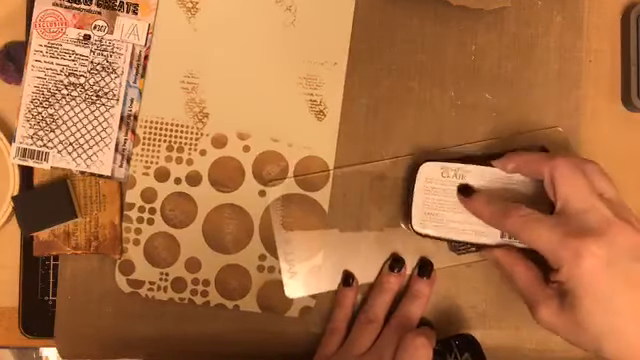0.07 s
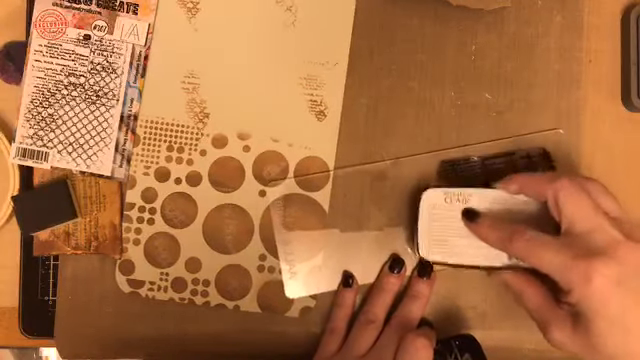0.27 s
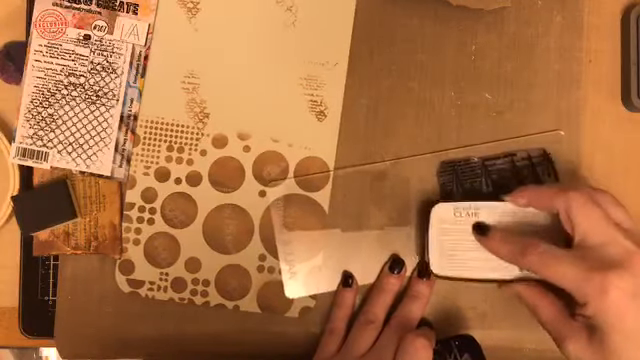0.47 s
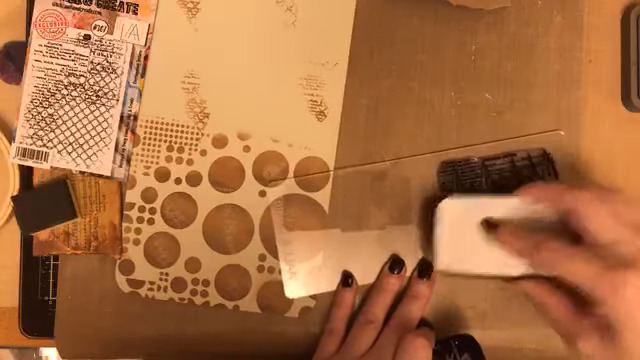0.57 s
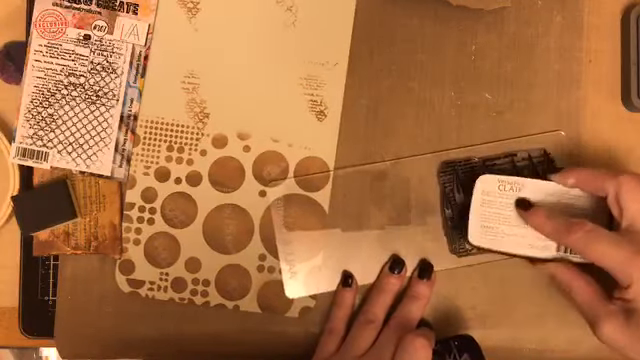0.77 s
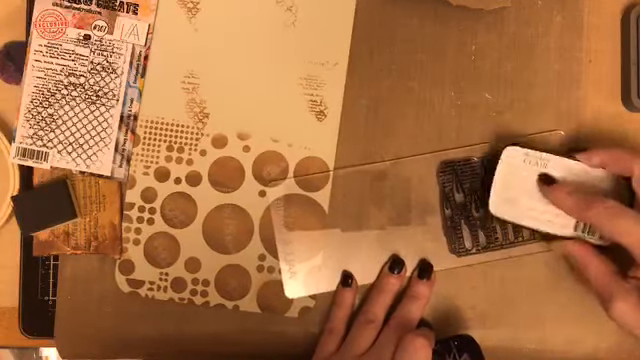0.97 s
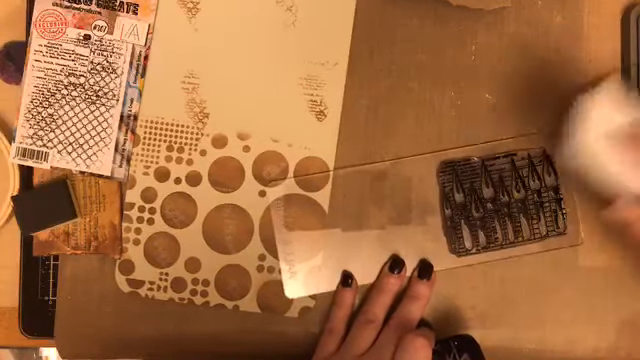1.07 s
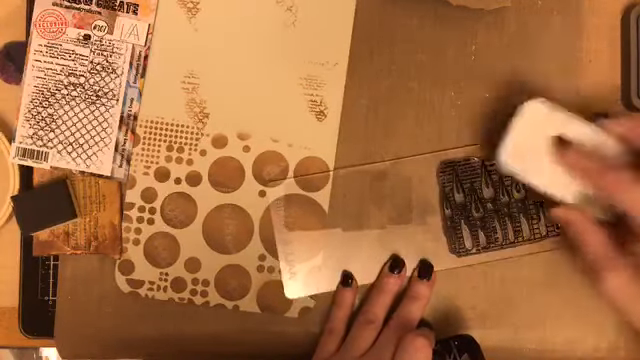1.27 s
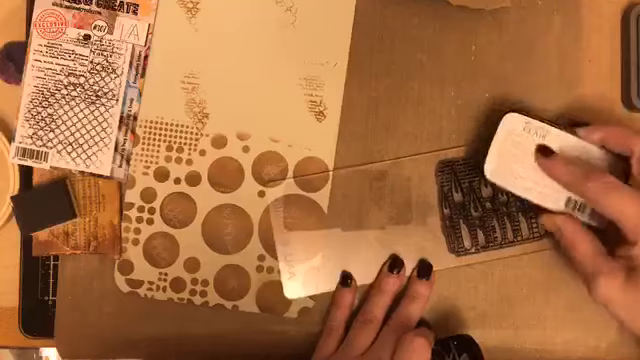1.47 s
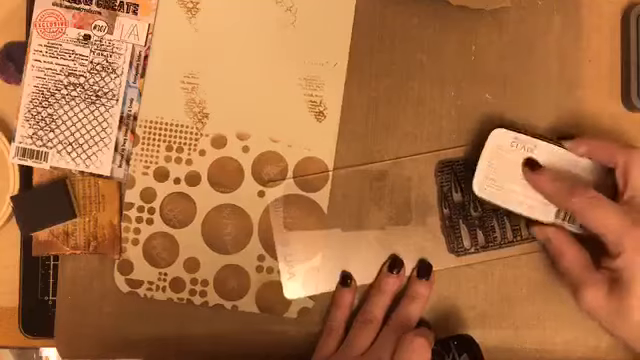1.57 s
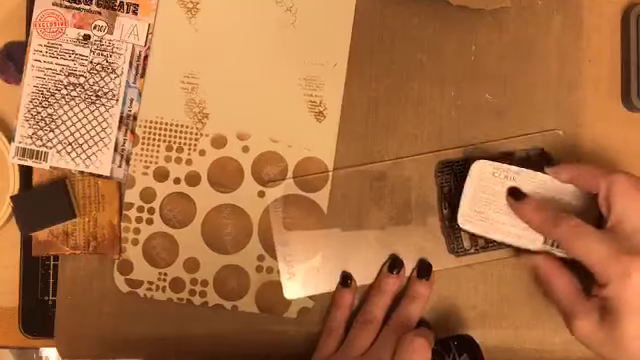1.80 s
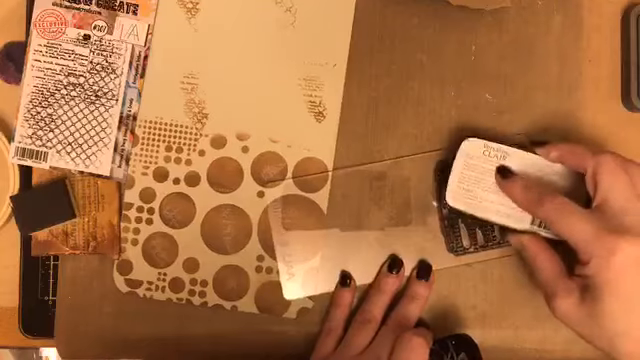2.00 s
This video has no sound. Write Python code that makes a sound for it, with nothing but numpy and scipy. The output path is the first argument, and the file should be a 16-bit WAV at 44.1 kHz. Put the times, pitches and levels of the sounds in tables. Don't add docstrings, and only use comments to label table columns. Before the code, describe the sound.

A plastic ink pad patted repeatedly onto a clear rubber stamp, light clacky taps in a quiet room

```python
import sys
import numpy as np
from scipy import signal
from scipy.fft import rfft, irfft
from scipy.io import wavfile
from scipy.ndimage import uniform_filter1d

SR = 44100
rng = np.random.default_rng(int(sys.argv[2]) if len(sys.argv) > 2 else 0)


def waveform_to_disk(signal):
    frames = np.transpose(np.atleast_2d(signal))
    scaled = np.clip(frames, -1, 1) * 32767
    samples = np.round(scaled).astype(np.int16)
    wavfile.write(sys.argv[1], SR, samples)


def amplitude_ratio(level_db):
    exponent = np.asarray(level_db, float) / 20
    return 10 ** exponent


N = 90052

# time in seconds, level in dB.
JOLTS = [
    (-.1923, 3.6),
    (.0408, -.6),
    (.2654, 1.1),
    (.4717, -.2),
    (.6966, 2.4),
    (.9104, -.6),
    (1.3498, 1.9),
    (1.5778, 1.7),
    (1.794, 3.2),
    (2.0233, 4.8),
]
# frequency in Hz, level in dB.
CRACK = [(420, -22.5), (850, 5), (1620, 4.5), (4520, -9.5), (6760, -11.5), (9400, -19), (12200, -20),
         (16000, -20.5)]
# frequency in Hz, level in dB.
PEEL = [(200, -31), (600, 0.5), (1400, 3.5), (2500, -1.5), (5000, -1.5), (9000, -8.5), (16000, -9.5)]
DETUNE, PLACE_DB = 0.008, 1.5


def read(points, hz):
    f, value = np.transpose(points)
    return np.interp(np.log(hz + 1), np.log(f + 1), value)


def add(mix, s, sound):
    k = round(s * SR)
    sound = sound[max(-k, 0):]
    part = mix[max(k, 0):][:len(sound)]
    part += sound[:len(part)]


def colour(x, points, tilt_db):
    hz = abs(np.fft.fftfreq(2048, 1 / SR))
    gain_db = read(points, hz) + tilt_db * np.log2((hz + 100) / 1500)
    log_gain = np.log(amplitude_ratio(gain_db))
    taps = np.fft.ifft(np.exp(signal.hilbert(log_gain).conj())).real[:1024]
    return signal.oaconvolve(x, taps / np.linalg.norm(taps))[:len(x)]


def ring(t, hz, db, t60):
    return amplitude_ratio(db - 60 * t / t60) * np.sin(2 * np.pi * hz * t)


def clicks(count, per_s, spread_db):
    u = rng.random(count)
    size = np.minimum(rng.exponential(1, count), 3) - 2
    sign = rng.choice([-1., 1.], count)
    return (u < per_s / SR) * amplitude_ratio(spread_db * size) * sign


def air():
    # frequency in Hz, level in dB per Hz.
    air_spectrum = [(25, 9.5), (60, 1.5), (120, -8.5), (250, -13), (630, -23), (2000, -26), (5000, -31.5),
                    (16000, -42.5)]
    air_db, patch_db = -66.5, 1.
    frames, hz = N // 256 + 5, np.fft.rfftfreq(1024, 1 / SR)
    a, b, patch = rng.standard_normal((frames, 513, 3)).T
    patch = uniform_filter1d(uniform_filter1d(patch, size=12, axis=0), size=12, axis=1)
    z = (a + 1j * b) * amplitude_ratio(read(air_spectrum, hz)[:, None] + patch_db * patch / patch.std())
    x = signal.istft(z, nperseg=1024, noverlap=768)[1][:N]
    above = signal.sosfilt(signal.butter(4, 100, "high", fs=SR, output="sos"), x)
    return amplitude_ratio(air_db) * x / above.std()


def table():
    # frequency in Hz, level in dB, t60 in seconds, side that moves first (sign).
    table_modes = [(34.5, -24.5, .294, -1), (35.7, -36.3, .93, 1), (36.6, -22.8, .229, 1),
                   (46.8, -26.3, .086, -1), (66.3, -38.1, .326, -1), (87.1, -23.5, .03, 1),
                   (115.5, -39.9, .09, -1), (152.5, -39, .137, -1)]
    t, out = np.arange(SR) / SR, np.zeros(N)
    thump = sum(side * ring(t, hz, db, t60) for hz, db, t60, side in table_modes)
    for s, db in JOLTS:
        add(out, s, amplitude_ratio(db) * thump)
    return out


def block():
    # frequency in Hz, level in dB, t60 in seconds.
    block_modes = [(187.6, -34.5, 0.11), (234, -39.5, 0.16), (278.3, -37.5, 0.13), (332.4, -41, 0.13),
                   (371.2, -41, 0.11), (429.8, -49.5, 0.16)]
    rock_db = [0, -10, -1, -1.5, 2, 1, -4.5, -10, -4.5, -1]
    rise_s = 0.019
    t, out = np.arange(SR // 2) / SR, np.zeros(N)
    swell = 1 - np.exp(-t / rise_s)
    for (s, _), level_db in zip(JOLTS, rock_db):
        spot = np.clip(rng.standard_normal((len(block_modes), 2)), -1.5, 1.5)
        modes = sum(ring(t, hz * (1 + DETUNE * a), db + PLACE_DB * b, t60)
                    for (hz, db, t60), (a, b) in zip(block_modes, spot))
        add(out, s, amplitude_ratio(level_db) * swell * modes)
    return out


def pat(start, delay, db, touch_db, tilt_db, deep_db, hollow_db, top_db, echo_db, rattle_db):
    # frequency in Hz, level in dB.
    far_lows = [(200, -15.5), (500, 1), (850, 2)]
    rattle_per_s, rattle_base_db, rattle_t60, spread_db = 5000, -13.5, 0.053, 4
    case_in_rattle, case_in_echo = 0.063, 0.51
    t = np.arange(SR // 3) / SR
    after = t - delay
    dying_db = rattle_base_db + rattle_db - 60 * np.maximum(after, 0) / rattle_t60
    level = np.where(after < 0, amplitude_ratio(touch_db), amplitude_ratio(dying_db))
    rattle = clicks(len(t), rattle_per_s, spread_db) * level
    rattle[0] = amplitude_ratio(touch_db)
    slap = -1. * (np.arange(len(t)) == round(delay * SR))
    case = case_modes(deep_db, hollow_db, top_db)
    direct = bend(body(slap, case, tilt_db) + body(rattle, case_in_rattle * case, tilt_db))
    to_walls = body(slap, case_in_echo * case, tilt_db, far_lows + CRACK[2:])
    return start, amplitude_ratio(db) * (direct + amplitude_ratio(echo_db) * room(to_walls))


def body(force, case, tilt_db, crack=CRACK):
    crack_db = 9.5
    return amplitude_ratio(crack_db) * colour(force, crack, tilt_db) + signal.fftconvolve(force, case)[:len(force)]


def case_modes(deep_db, hollow_db, top_db):
    # frequency in Hz, level in dB, t60 in seconds.
    modes = [(955, -26.5, 0.074), (1058, -23, 0.062), (1173, -25, 0.048), (1337, -23.5, 0.027),
             (1542, -17.5, 0.019), (1730, -16, 0.018), (1980, -26.5, 0.011), (2227, -26.5, 0.032),
             (2653, -37, 0.063), (3060, -33, 0.04)]
    deep_hz, hollow_hz = 1100, 1800
    t = np.arange(SR // 8) / SR
    spot = np.clip(rng.standard_normal((len(modes), 2)), -1.5, 1.5)
    out = np.zeros(len(t))
    for (hz, db, t60), (a, b) in zip(modes, spot):
        group_db = deep_db if hz < deep_hz else hollow_db if hz < hollow_hz else top_db
        out += ring(t, hz * (1 + DETUNE * a), db + PLACE_DB * b + group_db, t60)
    return out


def bend(x):
    bend_s = 0.0017
    hz = np.fft.rfftfreq(2 * len(x), 1 / SR)
    turn = np.exp(-2j * 2 * np.pi * bend_s * (np.sqrt(1000 * (hz + 300)) - hz / 9))
    return irfft(rfft(x, 2 * len(x)) * turn)[:len(x)]


def room(x):
    # frequency in Hz, t60 in seconds.
    room_t60 = [(200, 0.19), (700, 0.17), (1840, 0.15), (4850, 0.18), (12800, 0.18)]
    delay_s = 0.0016
    taps = rng.standard_normal(SR // 3)
    hz, t, z = signal.stft(taps, SR, nperseg=256)
    decay = amplitude_ratio(-60 * t / read(room_t60, hz)[:, None])
    tail = signal.istft(z * decay, SR, nperseg=256)[1]
    tail *= np.arange(len(tail)) / SR > delay_s
    return signal.fftconvolve(x, tail / np.linalg.norm(tail))[:len(x)]


def corner(start, db, tilt_db):
    contact = -1. * (np.arange(SR // 10) == 0)
    return start, amplitude_ratio(db) * bend(body(contact, case_modes(0, 0, 0), tilt_db))


def knock(start, db, hz, t60):
    rise_cycles = 1.1
    t = np.arange(SR // 4) / SR
    return start, (1 - np.exp(-t * hz / rise_cycles)) * ring(t, hz, db, t60)


def peel(top, db, rise, tilt_db):
    per_s, grain_db, fade_t60 = 9000, 4, 0.054
    lead_s = 0.06
    t = np.arange(SR // 4) / SR - lead_s
    shape = np.where(t < 0, np.exp(-(t / rise) ** 2), amplitude_ratio(-60 * np.maximum(t, 0) / fade_t60))
    return top - lead_s, 2 * amplitude_ratio(db) * shape * colour(clicks(len(t), per_s, grain_db), PEEL, tilt_db)


def tick(start, db, hz, t60):
    snap_db = 7
    t = np.arange(SR // 10) / SR
    return start, ring(t, hz, db, t60) + amplitude_ratio(db + snap_db) * colour(1. * (t == 0), PEEL, 0)


def rub(start, end, db, hz, width):
    t = np.arange(round((end - start) * SR)) / SR
    x = signal.lfilter(*signal.iirpeak(hz, hz / width, SR), rng.standard_normal(N))[:len(t)]
    return start, amplitude_ratio(db) * np.sin(np.pi * (t / t[-1]) ** 2) * x / x.std()


def scene():
    # first touch in seconds, touch to slap in seconds, slap in dB, touch in dB below the slap,
    # brightness in dB per octave.
    pat_rows = [
        (0.0377, 0.0033, -18.5, -28, 2),
        (0.2615, 0.0029, -18, -23, 2.5),
        (0.468, 0.0031, -16, -27, 2),
        (0.6931, 0.003, -12.5, -29, 1.06),
        (0.9087, 0.0045, -19.5, -4.5, 0.3),
        (1.3476, 0.0045, -15.5, -17, 0.7),
        (1.5755, .004, -16.5, -17, 1.1),
        (1.792, 0.0037, -13.5, -17.5, 2),
        (2.0219, 0.0028, -11.5, -12.5, 1.74),
    ]
    # case modes in dB near 1 kHz, near 1.5 kHz and above 2 kHz,
    # echo in dB, rattle in dB.
    spots = [(-0.5, 0, -2, -4, -1.5), (-1, 1, 2, -3, 0), (-9, 7, -20, -3, -3.5), (0.5, -18, 6, -3, 1),
             (4, -3, -11, 0, 1), (-5, -3, -2, -1.5, -1), (1, 3.5, 4, -2.5, 0.5), (-2.5, 4, -4, -4.5, -1),
             (5.5, 7.5, -8, 0.5, -1.5)]
    # start in seconds, level in dB,
    # brightness in dB per octave.
    corner_rows = [(0.0393, -26, 2), (0.2615, -35, 7), (.4686, -37, 5), (0.6933, -31, -3),
                   (0.6944, -21, 1.5), (0.7043, -27, 2), (0.9083, -31, -1), (.9099, -22, 0),
                   (0.9113, -27, 5), (1.3488, -25.5, -0.5), (1.35, -22, 1.5), (1.3513, -25.5, -0.5),
                   (1.577, -26.5, -1), (1.5776, -21.5, 4.5), (1.582, -28, 2.5), (1.7947, -26, 4.5),
                   (2.022, -21.5, -4), (2.0225, -19.5, -1.5)]
    # start in seconds, level in dB, pitch in Hz, t60 in seconds.
    knock_rows = [(.043, -36, 255, 0.054), (.043, -57, 360, 0.049), (.043, -53, 470, .05),
                  (.0425, -38.5, 640, 0.058), (.267, -34, 270, .11), (.266, -34.5, 356, 0.085),
                  (.267, -35.5, 441, 0.056), (.268, -38, 544, 0.078), (.2665, -27.5, 624, 0.032),
                  (.4725, -31, 270, 0.076), (.472, -29.5, 355, 0.079), (.472, -31, 424, 0.026),
                  (.473, -37, 530, 0.069), (.473, -22, 635, 0.034), (.699, -29.5, 271, 0.056),
                  (.6965, -26, 366, 0.059), (.698, -30, 740, 0.024), (.697, -32, 435, 0.087),
                  (.697, -28.5, 520.5, 0.067), (.6975, -23.5, 619, .04), (.697, -28, 890, 0.035),
                  (.9115, -21.5, 275, 0.046), (.9095, -30.5, 373, 0.041), (.912, -43, 545, 0.079),
                  (.9125, -22.5, 650, 0.056), (.914, -34.5, 785, .04), (1.350, -23.5, 272, 0.056),
                  (1.35, -28, 356, 0.058), (1.352, -40, 530, 0.053), (1.352, -28.5, 612, 0.046),
                  (1.352, -22, 667, 0.046), (1.5755, -26, 279, 0.031), (1.576, -39.5, 345, 0.065),
                  (1.579, -39, 423, .05), (1.579, -19.5, 628, 0.029), (1.795, -34.5, 265, 0.062),
                  (1.795, -42.5, 360, 0.081), (1.796, -25, 636, 0.044), (1.818, -40, 580, 0.086),
                  (1.7965, -24, 1540, 0.016), (2.024, -27.5, 260, .08), (2.0225, -21.5, 350, 0.034),
                  (2.023, -29.5, 440, .035), (2.024, -36, 510, .06), (2.024, -15.5, 664, 0.038)]
    # loudest moment in seconds, level in dB, rise in seconds,
    # brightness in dB per octave.
    peel_rows = [(.15, -61, 0.01, 11), (0.188, -58.5, 0.016, -1), (.408, -48, 0.003, 2.5),
                 (0.597, -53, 0.0055, 1.5), (0.834, -57.5, 0.013, -1), (1.035, -58, 0.016, -1.5),
                 (1.195, -68, 0.0074, -18), (1.495, -56.5, 0.014, -1.5), (1.711, -53, 0.0086, -3),
                 (1.917, -46.5, 0.0096, -1.5), (1.947, -81.5, 0.0054, -18)]
    # start in seconds, level in dB, pitch in Hz, t60 in seconds.
    tick_rows = [(0.1473, -54, 13400, 0.0055), (.158, -65, 13100, .004), (0.163, -56, 3760, 0.0098),
                 (0.19, -47.5, 1430, 0.013), (.4051, -43.5, 2100, 0.011), (.4052, -36, 7360, 0.0014),
                 (0.4033, -42, 12000, 0.0026), (0.405, -48, 15000, .003), (.4075, -49, 2000, .012),
                 (.615, -56, 2300, .006), (1.037, -48.5, 1320, 0.011), (1.079, -54, 2470, 0.0055),
                 (1.15, -58.5, 3660, .015), (1.1497, -56, 890, 0.023), (1.191, -54.5, 2000, 0.019),
                 (1.1913, -47, 560, 0.013), (1.204, -59, 3300, 0.014), (1.236, -63.5, 2110, 0.042),
                 (1.523, -56, 3930, 0.0033), (1.708, -50, 1590, .02), (1.913, -44, 1350, 0.0086),
                 (1.9155, -45, 6100, 0.0062), (.835, -50, 1480, 0.013), (1.495, -51, 1360, 0.01),
                 (.317, -46, 3580, 0.0082), (1.1524, -59, 5250, .01)]
    # start in seconds, end in seconds, level in dB, pitch in Hz, width in Hz.
    rub_rows = [
        (1.252, 1.367, -73, 1970, 250),
    ]

    near, pats, hollow, edges = block(), np.zeros(N), np.zeros(N), np.zeros(N)
    for row, spot in zip(pat_rows, spots):
        add(pats, *pat(*row, *spot))
    layers = ((edges, corner, corner_rows), (hollow, knock, knock_rows), (near, peel, peel_rows),
              (near, tick, tick_rows), (near, rub, rub_rows))
    for mix, source, rows in layers:
        for row in rows:
            add(mix, *source(*row))
    echo = room(amplitude_ratio(-4) * near + amplitude_ratio(-7.5) * hollow + amplitude_ratio(-5) * edges)
    return (pats + near + hollow + edges + echo + table() + air())[None]


def top_cut(x):
    return signal.sosfilt(signal.butter(12, 16800, fs=SR, output="sos"), x)


def record(dry):
    edge_hz, leak_db = 15900, -22
    low_pass = signal.firwin(511, edge_hz, window=("kaiser", 7), fs=SR)
    x = signal.oaconvolve(dry, low_pass[None], "same")
    return top_cut(x + amplitude_ratio(leak_db) * (dry - x))


dry = scene()
out = record(dry)
waveform_to_disk(out)
```